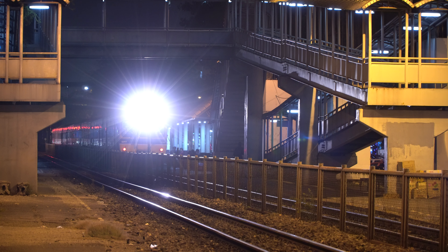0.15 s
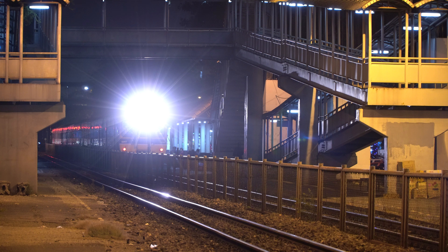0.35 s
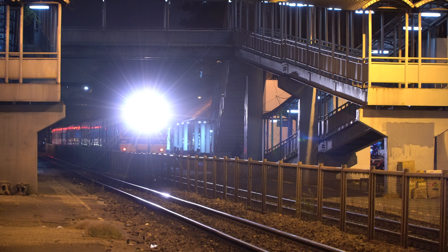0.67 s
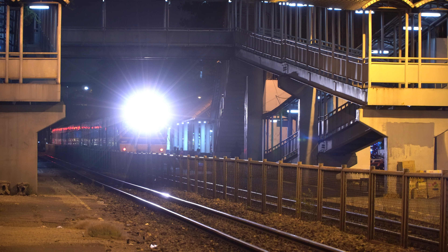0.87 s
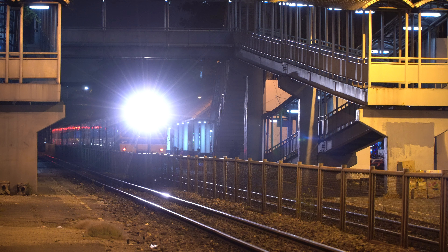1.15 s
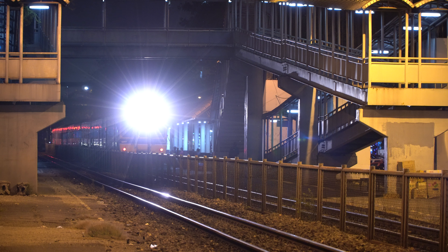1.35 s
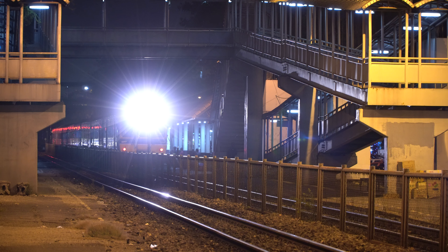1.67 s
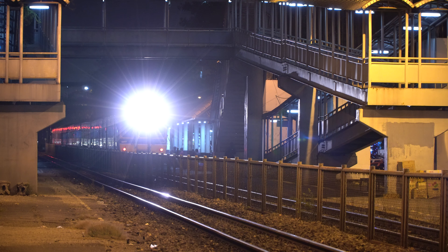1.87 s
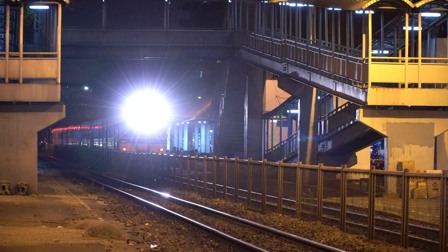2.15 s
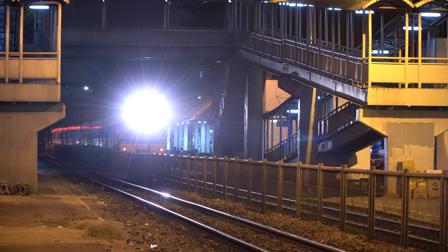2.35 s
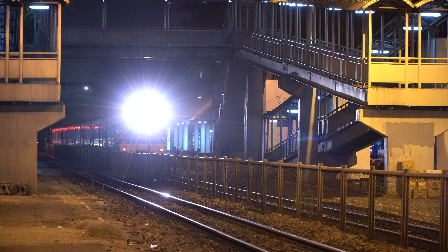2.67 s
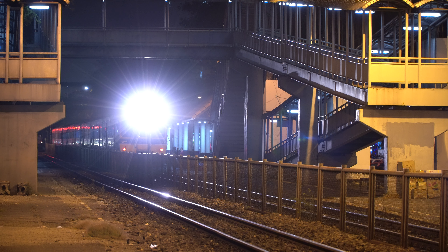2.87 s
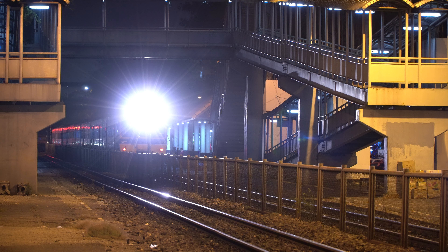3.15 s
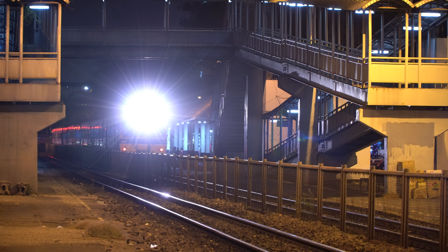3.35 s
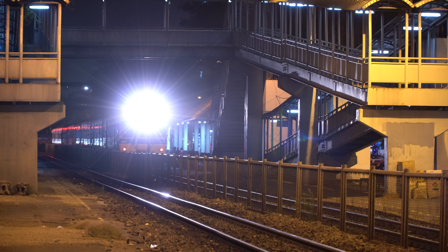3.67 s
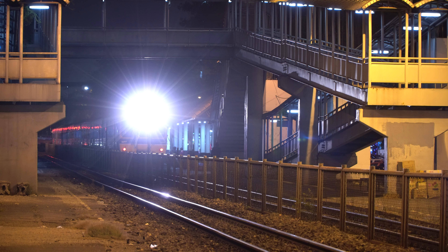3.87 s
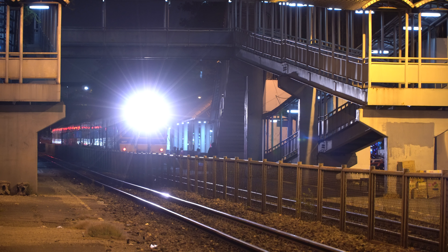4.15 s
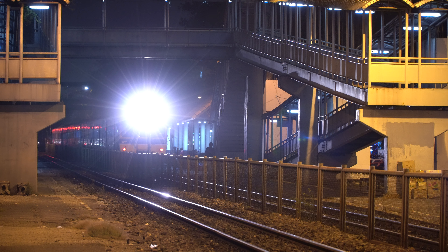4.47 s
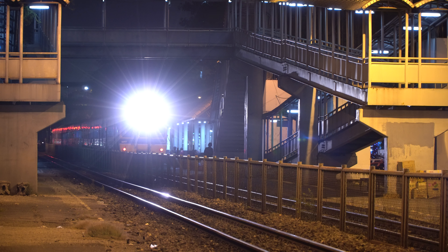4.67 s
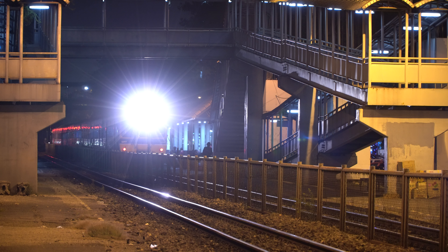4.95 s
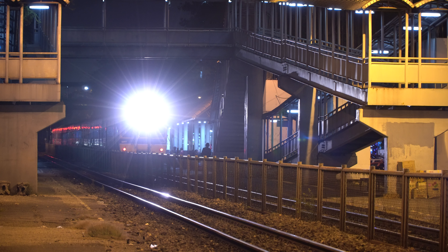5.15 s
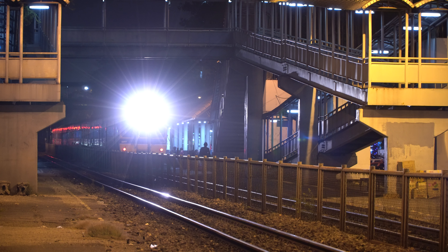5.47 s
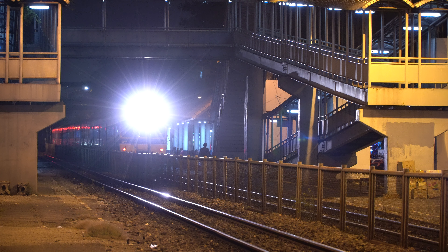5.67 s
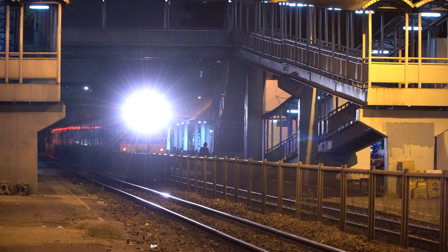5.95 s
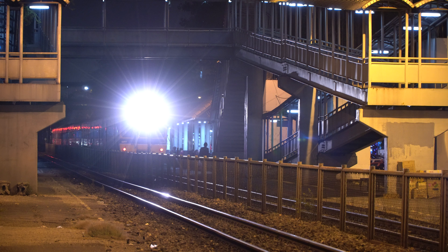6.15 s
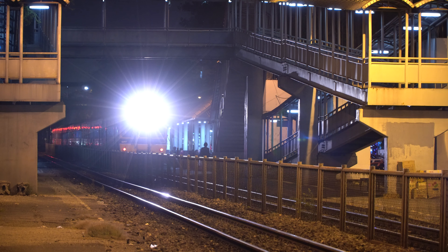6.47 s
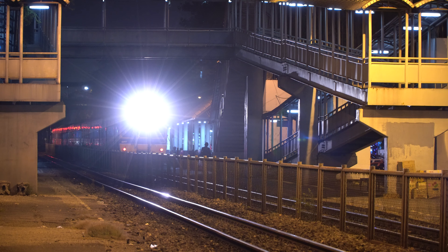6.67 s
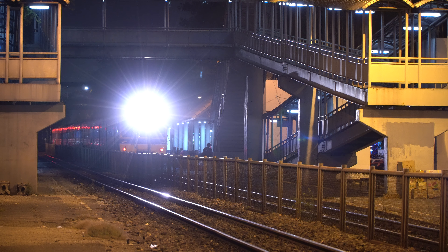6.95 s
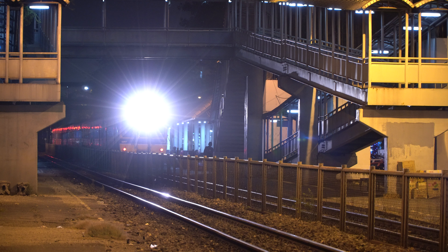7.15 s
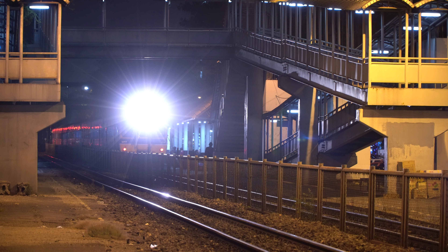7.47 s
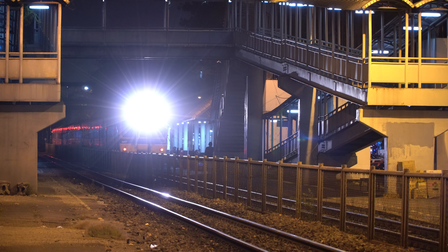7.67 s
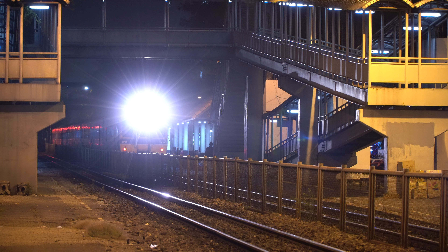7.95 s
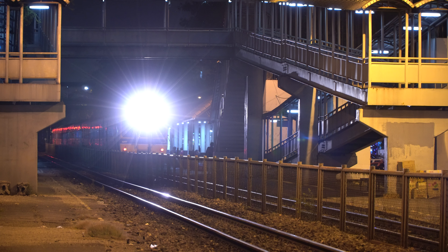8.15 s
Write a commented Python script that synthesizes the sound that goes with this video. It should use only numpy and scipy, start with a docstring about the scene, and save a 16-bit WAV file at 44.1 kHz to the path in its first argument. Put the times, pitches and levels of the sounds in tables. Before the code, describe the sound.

A diesel railcar rolls slowly into a station at night with a deep, wavering rumble over the roar of rails and city. Its engine tones sink at first, then another engine revs up about halfway and eases off slightly. Close to the microphone a cricket chirps quickly and evenly throughout, with a far chorus behind it. Faint rustles, thin squeaks and a few ticks come from nearby, and brief horn tones drift in from the street.

```python
"""A diesel railcar rolls slowly in at a night station: two engines slow down and another revs up, each a
harmonic series on its firing rate. Beneath lie low wavering tones and the shaped noise of a deep rumble
and the roar of rails and city. A near cricket chirps in pairs of wing strokes over a far chorus. Something
rustles, squeaks and ticks close by, and faint horn tones drift in from the street through hissing air."""
import sys
import numpy as np
from scipy import signal
from scipy.io import wavfile
from scipy.ndimage import uniform_filter1d

SR = 44100
rng = np.random.default_rng(int(sys.argv[2]) if len(sys.argv) > 2 else 0)


def master(y):
    """Save y as 16-bit WAV."""
    cut = np.clip(np.atleast_2d(y).T, -1, 1)
    pcm = np.round(cut * 32767)  # scale
    wavfile.write(sys.argv[1], SR, pcm.astype(np.int16))


N = 366030
TIME = np.arange(N) / SR


def amp(db):
    """Decibels to amplitude ratio."""
    return 10 ** (np.asarray(db) / 20)


def unit_rms(x):
    """Normalisation to rms 1."""
    return x / np.sqrt(np.mean(x ** 2) + 1e-20)


def columns(rows, at):
    """Linear interpolation of each later column against the first."""
    axis, *rest = np.transpose(rows)
    return [np.interp(at, axis, column) for column in rest]


def add(mix, start, sound):
    """Superposition of a sound from a start in seconds."""
    part = mix[max(round(start * SR), 0):][:len(sound)]
    part += sound[:len(part)]


def drift(count, seconds):
    """Low-pass noise of rms 1 that varies over the given time."""
    width = max(round(seconds * SR), 1)
    return unit_rms(uniform_filter1d(uniform_filter1d(rng.standard_normal(count), width), width))


def band_noise(count, hz, width_hz):
    """Resonance by heterodyning: noise is shifted down by hz, low-passed twice and shifted back."""
    carrier = np.exp(2j * np.pi * np.cumsum(hz * np.ones(count)) / SR)
    pole = np.exp(-np.pi * width_hz / SR)
    shifted = rng.standard_normal(count) / carrier
    smoothed = signal.lfilter([1], np.convolve([1, -pole], [1, -pole]), shifted)
    return unit_rms((carrier * smoothed).real)


def shaped_noise(spectrum, size, patchy_db=.5, tilt=((0, 0), (9, 0))):
    """Spectral shaping: random short-time spectra take a contour, drifting patches and a moving tilt."""
    frames, hz = 4 * N // size + 5, np.fft.rfftfreq(size, 1 / SR)
    real, imag, patches = rng.standard_normal((frames, len(hz), 3)).T
    patches = unit_rms(uniform_filter1d(uniform_filter1d(patches, 12, 0), 14, 1))
    knot_hz, knot_db = np.transpose(spectrum)
    contour_db = np.interp(np.log(hz + 1), np.log(knot_hz + 1), knot_db)[:, None]
    octaves = np.log2((hz + 30) / 1000)[:, None]
    tilt_db = octaves * columns(tilt, np.arange(frames) * size / 4 / SR)[-1]
    spectra = (real + 1j * imag) * amp(contour_db + tilt_db + patchy_db * patches)
    return unit_rms(signal.istft(spectra, nperseg=size, noverlap=3 * size // 4)[1][:N])


# Spectrum of the air. Each row: frequency in Hz, relative density in dB.
AIR_SPECTRUM = [(3200, -44), (5500, -6), (6500, -5), (7500, -9.5), (8800, -10), (12000, -13), (13500, -19),
                (15700, -18)]

def air_hiss():
    """Stationary high-frequency noise is heard as a steady hiss."""
    return amp(-51) * shaped_noise(AIR_SPECTRUM, size=1024)


# Far crickets. Each row: centre in Hz, bandwidth in Hz, level in dB.
CHORUS_BANDS = [(6940, 260, -52.5), (7360, 224, -52), (7620, 380, -53.5)]

def far_crickets():
    """Incoherent addition: many songs merge into flickering bands of noise."""
    return sum(amp(db + 2.5 * drift(N, .008)) * band_noise(N, hz, width)
               for hz, width, db in CHORUS_BANDS)


# Horn overtones. Each row: start in seconds, length in seconds, frequency in Hz, rms level in dB.
HORN_PARTIALS = [(0.714, 0.16, 2050, -45), (1.056, 0.4, 2067, -42), (1.799, 0.21, 1052, -37.5),
                 (2.64, 0.17, 1485, -39), (3.65, .18, 3165, -54), (3.65, .18, 4220, -58),
                 (3.7, 0.15, 3692, -54), (3.747, 0.16, 2637, -59), (3.782, .24, 3790, -52),
                 (4.978, 0.13, 1400, -41), (4.989, .18, 2848, -49), (4.995, 0.19, 4272, -50),
                 (5.253, 0.25, 1860, -45), (5.299, 0.15, 3425, -51), (5.747, 0.12, 1880, -44),
                 (5.88, 0.18, 2848, -49), (5.896, .2, 4295, -54), (6.03, 0.17, 3670, -48),
                 (6.102, .2, 2637, -48), (6.204, 0.17, 1660, -38.5), (6.472, 0.28, 2592, -46),
                 (6.98, 0.19, 3120, -53), (7.277, 0.33, 2085, -43.5), (7.612, 0.35, 1986, -44.5),
                 (7.9, 0.27, 2776, -49)]

def far_horns():
    """Masking leaves single partials of far horns above the roar: steady sines with soft edges."""
    out = np.zeros(N)
    for start, length, hz, db in HORN_PARTIALS:
        t = np.arange(round(length * SR)) / SR
        tone = np.sqrt(2) * np.sin(2 * np.pi * hz * t)
        add(out, start, amp(db) * tone * signal.windows.tukey(len(t), .3))
    return out


# Course of the roar. Each row: time in seconds, level in dB, tilt in dB per octave about 1 kHz.
ROAR_COURSE = [(0.0, -25, 0.76), (.9, -25.5, 0.0), (1.45, -27, 0.6), (2.5, -26.5, -.3), (3.7, -29, -0.3),
               (4.5, -28, -0.26), (5.9, -26, -0.53), (6.3, -27, 0.25), (7.6, -27.5, 0), (8.3, -27.5, -0.4)]
# Its spectrum. Each row: frequency in Hz, relative density in dB.
ROAR_SPECTRUM = [(140, -32), (230, 0.5), (299, -8), (379, -5.5), (447, -10), (659, -8), (834, -10),
                 (971, -8.5), (1340, -11.5), (2110, -16.5), (2390, -19), (3990, -26), (6300, -32),
                 (8190, -34), (13900, -120)]

def roar():
    """Rails and city sum to broadband noise whose spectral tilt sets its brightness."""
    level_db, _ = columns(ROAR_COURSE, TIME)
    return amp(level_db) * shaped_noise(ROAR_SPECTRUM, size=1024, patchy_db=.73, tilt=ROAR_COURSE)


# Swells. Each row: middle in seconds, length in seconds, centre in Hz, bandwidth in Hz, level in dB.
ROAR_SWELLS = [(0.55, .8, 1330, 400, -35), (.7, 2.0, 8200, 700, -53), (1.35, .9, 1250, 440, -33),
               (1.36, .2, 2100, 270, -36), (1.62, .2, 1200, 400, -36), (5.71, .16, 3380, 320, -46),
               (5.9, .8, 1300, 610, -39), (6.02, .2, 2900, 400, -47), (6.9, 3.0, 353, 140, -35),
               (8.1, .5, 380, 140, -38)]

def roar_swells():
    """Resonance picks out gritty bands of the roar that rise and fall."""
    out = np.zeros(N)
    for middle, length, hz, width, db in ROAR_SWELLS:
        count = round(length * SR)
        band = band_noise(count, hz, width)
        add(out, middle - length / 2, amp(db + 1.5 * drift(count, .02)) * band * np.hanning(count))
    return out


# Continuous rustle. Each row: time in seconds, level in dB.
RUSTLE_FLOOR = [(0.0, -46.5), (1.4, -49), (2.1, -52), (2.6, -48.5), (3.1, -51), (3.9, -56), (5.1, -50.5),
                (5.6, -60), (6.8, -69), (8.3, -64)]
# Rustling movements. Each row: middle in seconds, length in seconds, level in dB.
RUSTLE_STIRS = [(0.277, 0.13, -46), (.62, 0.18, -45), (.98, 0.22, -47), (1.27, .26, -49), (1.5, .12, -42),
                (1.78, .35, -50), (2.427, 0.037, -43.5), (2.98, .3, -56), (3.308, 0.39, -45),
                (4.103, 0.45, -49.5), (4.75, 0.58, -50), (4.907, 0.079, -47), (5.17, .3, -62),
                (5.48, .08, -56), (5.889, .07, -53), (6.329, .2, -56), (7.245, 0.12, -57),
                (8.13, 0.16, -51)]
# Spectrum of both. Each row: frequency in Hz, relative density in dB.
RUSTLE_SPECTRUM = [(2500, -40), (4500, 0), (7000, 1.5), (11500, -1.5), (13200, -3.5), (14000, -10),
                   (15800, -21)]

def rustle():
    """Incoherent sounds add in power: brief movements lift a floor of grainy noise."""
    power = amp(columns(RUSTLE_FLOOR, TIME)[0]) ** 2
    for middle, length, db in RUSTLE_STIRS:
        envelope = amp(db) * signal.windows.tukey(round(length * SR), .67)
        add(power, middle - length / 2, envelope ** 2)
    grain = amp(.82 * drift(N, .002))
    return np.sqrt(power) * grain * shaped_noise(RUSTLE_SPECTRUM, size=256)


# Thin squeaks. Each row: start in seconds, length in seconds, first and last pitch in Hz, level in dB.
SQUEAK_GLIDES = [(2.05, .12, 8500, 8900, -57), (2.84, .09, 11200, 12300, -55),
                 (2.85, .09, 10200, 11000, -60), (2.93, .075, 11400, 12400, -56),
                 (2.98, .07, 12900, 13900, -57), (3.03, 0.15, 11000, 11100, -55),
                 (3.05, .08, 11900, 11300, -58), (3.06, .14, 13150, 13050, -59),
                 (3.16, .07, 12200, 12400, -56), (3.2, .1, 11100, 11700, -53),
                 (4.75, .08, 9900, 12600, -54), (4.89, .05, 13300, 11300, -58),
                 (4.83, .07, 13200, 13400, -58), (5.0, .29, 10550, 10520, -62),
                 (5.06, .11, 13300, 13200, -63), (5.862, 0.18, 9050, 8650, -56),
                 (7.561, 0.13, 11400, 10410, -66), (7.6, .1, 8550, 8600, -55)]

def squeaks():
    """A narrow resonance glides and wavers; fast amplitude modulation makes it rasp."""
    out = np.zeros(N)
    for start, length, first_hz, last_hz, db in SQUEAK_GLIDES:
        count = round(length * SR)
        hz = np.linspace(first_hz, last_hz, count) * (1 + .006 * drift(count, .006))
        envelope = amp(db + 2.2 * drift(count, .004)) * signal.windows.tukey(count, .4)
        add(out, start, envelope * band_noise(count, hz, width_hz=330))
    return out


# Dry ticks. Each row: start in seconds, relative level in dB, centre in Hz.
DRY_TICKS = [(.998, -37, 12500), (1.11, -39, 12000), (2.4204, -29, 11500), (3.3228, -26, 12400)]

def ticks():
    """Rapid exponential decay turns a wide band of noise into a tick."""
    out, t = np.zeros(N), np.arange(600) / SR
    for start, db, hz in DRY_TICKS:
        add(out, start, amp(db) / 2 * band_noise(len(t), hz, width_hz=5000) * np.exp(-t / .0018))
    return out


# Chirps of the near cricket. Each entry: start in seconds.
CHIRP_STARTS = [.0364, .139, 0.252, .3618, 0.474, .586, .6955, 0.803, .9074, 1.018, 1.1207, 1.231, 1.34,
                1.4468, 1.5569, 1.6673, 1.778, 1.888, 1.997, 2.113, 2.2259, 2.3347, 2.4426, 2.5527, 2.667,
                2.7826, 2.8949, 3.0075, 3.118, 3.23, 3.351, 3.4618, 3.5685, 3.6793, 3.7901, 3.9031, 4.01,
                4.1242, 4.2419, 4.3544, 4.4597, 4.5712, 4.679, 4.7921, 4.901, 5.016, 5.1263, 5.2375, 5.3457,
                5.4554, 5.5717, 5.6821, 5.7928, 5.8968, 6.004, 6.1131, 6.2219, 6.334, 6.4398, 6.5475,
                6.6535, 6.7626, 6.8741, 6.983, 7.0941, 7.1986, 7.3077, 7.4241, 7.526, 7.6402, 7.7495,
                7.8593, 7.9622, 8.0736, 8.1839, 8.29]
# Strength of its song. Each row: time in seconds, levels of the first and second wing stroke in dB.
STROKE_LEVELS = [(0.0, -30.5, -29.5), (2.4, -32.5, -29.5), (5.0, -31, -28.5), (6.3, -29, -28),
                 (7.5, -30.5, -30), (8.3, -32, -30)]

def near_cricket():
    """Stridulation: each of a chirp's two wing strokes is a falling whistle in two humps."""
    out, t = np.zeros(N), np.arange(round(.013 * SR)) / SR
    first_hump = (t / .002) ** 2 * np.exp(2 - t / .00105)
    envelope = first_hump + .5 * np.exp(-((t - .007) / .0022) ** 2)
    glide_hz, spacing_s = 7730 - 61000 * t, .0163
    for start in CHIRP_STARTS:
        detune, scatter_db = rng.standard_normal((2, 2))
        for stroke, db in enumerate(columns(STROKE_LEVELS, start) + scatter_db):
            phase = 2 * np.pi * np.cumsum(glide_hz * (1 + .005 * detune[stroke])) / SR
            whistle = np.sin(phase) + .03 * np.sin(2 * phase)
            add(out, start - .003 + spacing_s * stroke, amp(db) * envelope * whistle)
    tail = rng.standard_normal(SR // 5) * amp(-60 * TIME[:SR // 5] / .15)  # falls 60 dB in 0.15 s
    return out + amp(-11) * signal.oaconvolve(out, tail / np.linalg.norm(tail))[:N]


# Course of the rumble. Each row: time in seconds, levels of the deep and upper band in dB.
RUMBLE_LEVELS = [(0.0, -17.5, -13.5), (.7, -16.5, -16), (1.4, -16, -20), (2.1, -16.5, -24.5),
                 (3.5, -18, -20.5), (4.9, -20, -16), (6.2, -13, -19), (7.0, -17.5, -21.5), (7.6, -15, -21),
                 (8.3, -23, -22.5)]
# Spectra of the two bands. Each row: frequency in Hz, relative density in dB.
DEEP_SPECTRUM = [(8.8, -18), (15, -1.5), (59, 3), (100, -8.5), (130, -43), (220, -120)]
UPPER_SPECTRUM = [(53, -0.5), (90, 3), (168, -2.5), (300, -20), (390, -51), (660, -120)]
# Darkening of the upper band. Each row: time in seconds, tilt in dB per octave.
UPPER_TILT = [(0.0, 0.5), (9.0, -2)]

def rumble():
    """Two bands of low-frequency noise superpose; a falling spectral tilt darkens the upper one."""
    deep_db, upper_db = columns(RUMBLE_LEVELS, TIME)
    deep = amp(deep_db) * shaped_noise(DEEP_SPECTRUM, size=8192, patchy_db=.4)
    return deep + amp(upper_db) * shaped_noise(UPPER_SPECTRUM, size=4096, tilt=UPPER_TILT)


# Response of exhaust pipe and station. Each row: frequency in Hz, gain in dB.
PIPE_RESPONSE = [(28, -2), (40, -8.5), (70, -5.5), (105, -10), (130, -6), (165, -1), (195, -12), (225, -14),
                 (300, -39.5)]
# Source spectrum of the cylinders. Each entry: gain in dB, for harmonics 1 to 7.
HARMONIC_GAINS = [1, -1.5, -1.5, 0.9, -0.4, -3.5, -5.5]

def harmonic_tone(rows, harmonics, waver, flutter_db=2.2, through_pipe=False):
    """Harmonics of a wavering fundamental; each flutters at random, as when echoes add and cancel."""
    t = np.arange(rows[0][0], rows[-1][0], 1 / SR)
    hz, *levels_db = columns(rows, t)
    if through_pipe:
        levels_db = [levels_db[0] + db + columns(PIPE_RESPONSE, k * hz)[0]
                     for k, db in zip(harmonics, HARMONIC_GAINS)]
    cycles = np.cumsum(hz * (1 + waver * drift(len(t), .1))) / SR
    out, fade = np.zeros(N), signal.windows.tukey(len(t), .02)
    for k, db in zip(harmonics, levels_db):
        envelope = np.sqrt(2) * amp(db + flutter_db * drift(len(t), .07)) * fade
        add(out, t[0], envelope * np.sin(2 * np.pi * (k * cycles + rng.random())))
    return out


# Low tones in the rumble, one table each. Each row: time in seconds, pitch in Hz, level in dB.
LOW_DRONES = [
    [(3.1, 45.7, -46), (3.4, 49.83, -18), (3.65, 56.93, -17), (3.95, 59, -13), (4.3, 55, -38)],
    [(5.2, 47.1, -46), (5.75, 50.16, -17), (6.3, 54.22, -21), (7.0, 58.77, -16), (7.4, 58.82, -20),
     (7.8, 58.04, -11.5), (8.3, 57.4, -26)],
    [(4.3, 24.6, -38), (4.7, 25.66, -19), (5.4, 32.3, -28.5), (5.85, 32.5, -17.5), (6.6, 36, -39)],
    [(7.2, 66.9, -42), (7.45, 66.02, -17.5), (8.3, 63.22, -20)],
    [(7.3, 49.44, -38), (7.9, 49.37, -22), (8.3, 49.3, -37)],
]

def low_drones():
    """Slow modulation makes single sines waver, swell and fade."""
    return sum(harmonic_tone(rows, [1], waver=.012) for rows in LOW_DRONES)


# A slowing engine. Each row: time in seconds, firing rate in Hz, level in dB before cylinders and pipe.
SLOWING_ENGINE = [(0.0, 40.6, -15.5), (.35, 39.0, -16.5), (.7, 37.4, -20.5), (1.5, 35.1, -23.5),
                  (2.1, 33.64, -21), (3.2, 30.0, -19.5), (4.2, 27.9, -25.5), (4.7, 27.0, -30)]
# A second one. Each row: time in seconds, firing rate in Hz, levels of harmonics 4 and 5 in dB.
COASTING_ENGINE = [(.1, 35.67, -33, -41), (.7, 31.75, -21, -42), (1.3, 29.7, -22, -23.5),
                   (2.3, 27.96, -25, -22.5), (2.9, 26.76, -40, -23.5), (3.2, 26.2, -50, -47)]
# One that revs up. Each row: time in seconds, firing rate in Hz, levels of harmonics 1 and 2 in dB.
REVVING_ENGINE = [(4.5, 51.1, -53, -50), (4.8, 54.74, -19, -42), (5.2, 63.8, -18.5, -40),
                  (5.6, 72, -19, -22), (6.0, 79.93, -20.5, -28), (6.4, 82.3, -18.5, -44),
                  (6.7, 80.7, -16, -44), (7.1, 75.4, -16.5, -42), (7.5, 74.04, -24.5, -43),
                  (7.9, 73.1, -19, -46), (8.3, 72, -19.5, -51)]

def diesel_engines():
    """Periodic firing sets the pitch: two engines fall and one rises."""
    slowing = harmonic_tone(SLOWING_ENGINE, range(1, 8), waver=.004, flutter_db=2.5, through_pipe=True)
    coasting = harmonic_tone(COASTING_ENGINE, [4, 5], waver=.01)
    revving = harmonic_tone(REVVING_ENGINE, [1, 2], waver=.015)
    return slowing + coasting + revving


def scene():
    """Linear superposition of all sources on one channel."""
    station = diesel_engines() + low_drones() + rumble() + roar() + roar_swells()
    crickets = near_cricket() + far_crickets()
    close_by = rustle() + air_hiss() + squeaks() + ticks()
    return (station + crickets + close_by + far_horns())[None]


def record(dry):
    """Soft saturation rounds the loudest bass swings; a low-pass filter limits the band."""
    ceiling, cutoff_hz = .96, 15750
    rounded = dry / (1 + abs(dry / ceiling) ** 4) ** (1 / 4)
    low_pass = signal.firwin(1023, cutoff_hz, window=("kaiser", 9), fs=SR)
    return signal.oaconvolve(rounded, low_pass[None], "same")


dry = scene()
out = record(dry)
master(out)
```